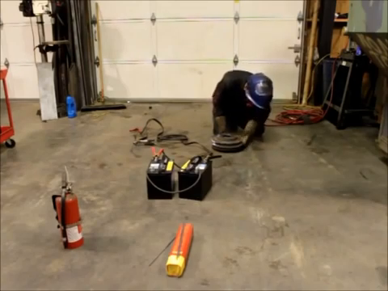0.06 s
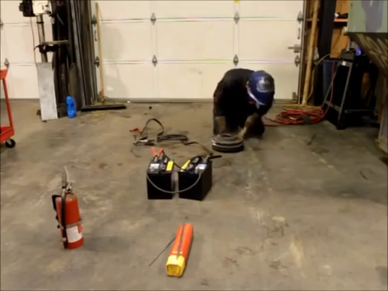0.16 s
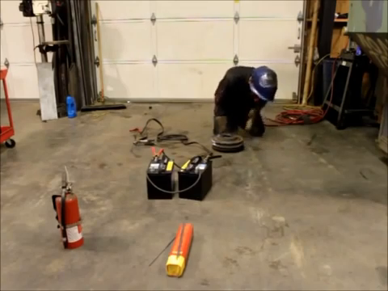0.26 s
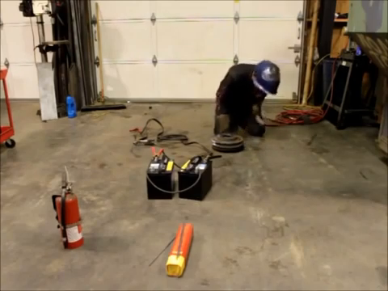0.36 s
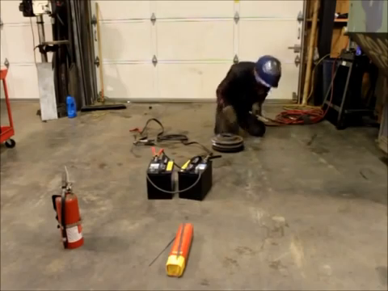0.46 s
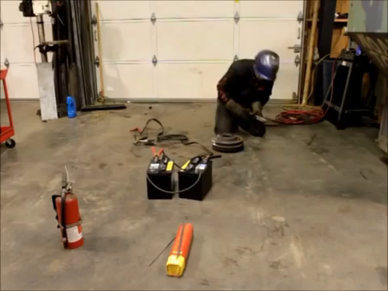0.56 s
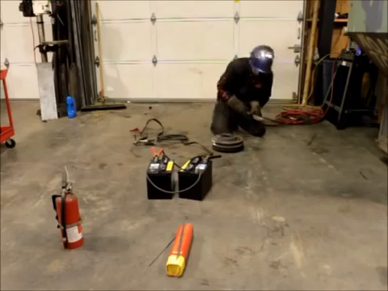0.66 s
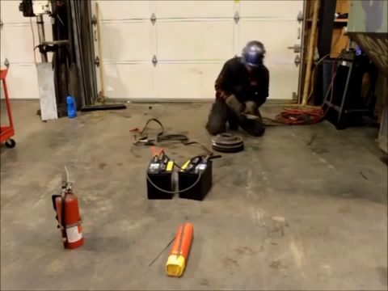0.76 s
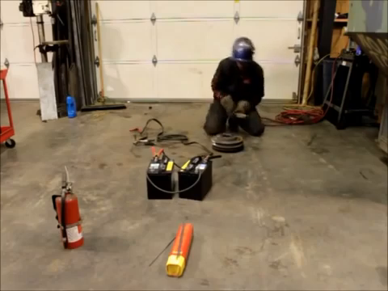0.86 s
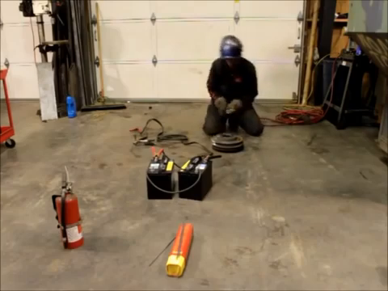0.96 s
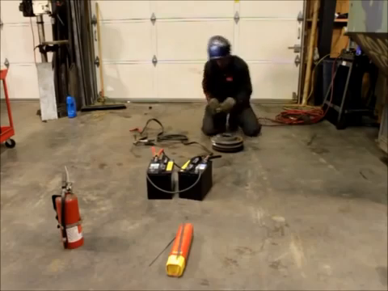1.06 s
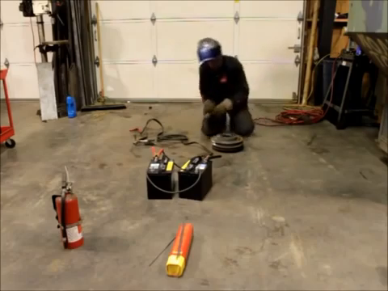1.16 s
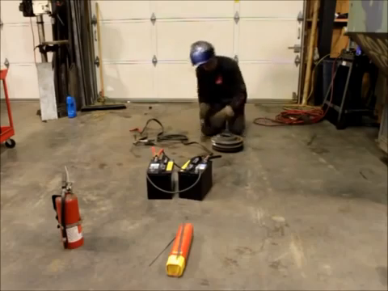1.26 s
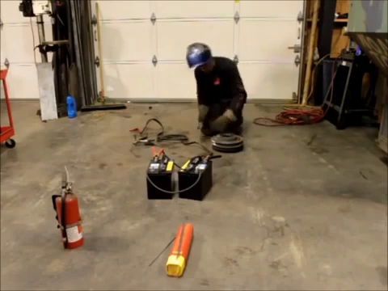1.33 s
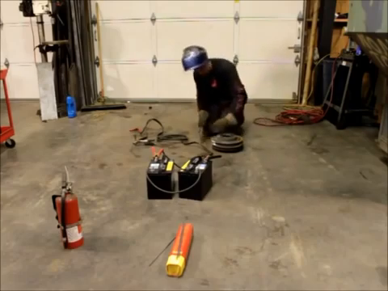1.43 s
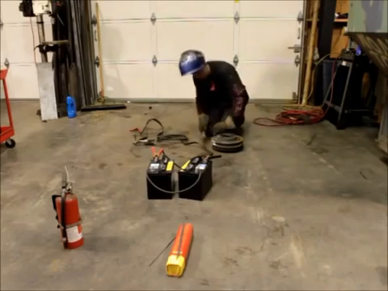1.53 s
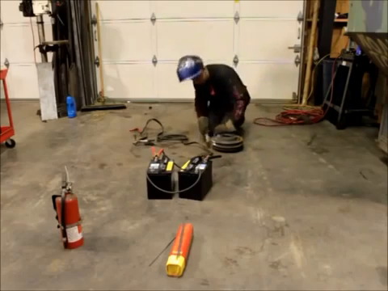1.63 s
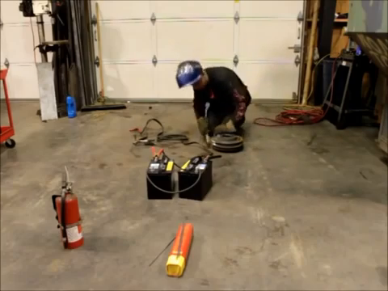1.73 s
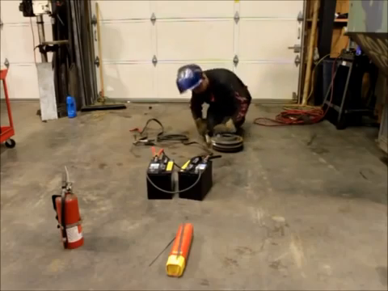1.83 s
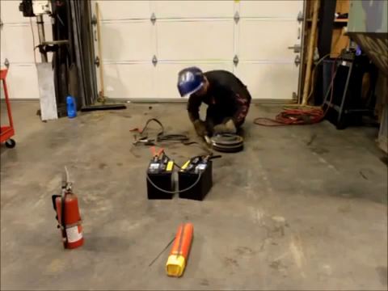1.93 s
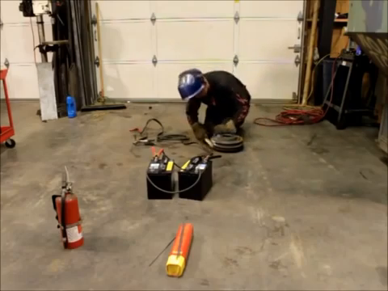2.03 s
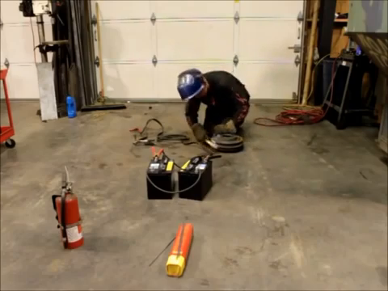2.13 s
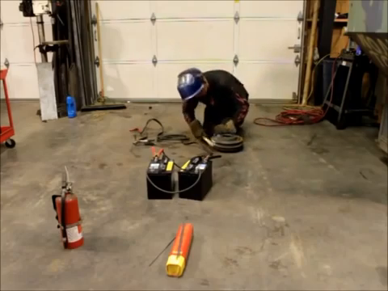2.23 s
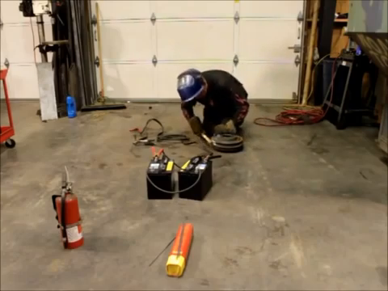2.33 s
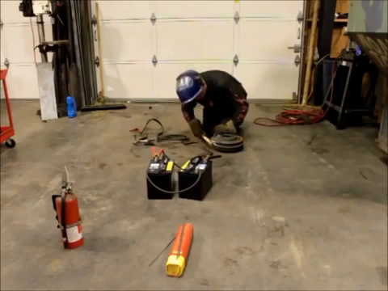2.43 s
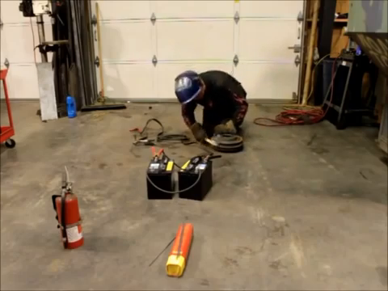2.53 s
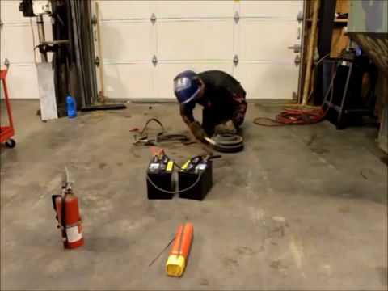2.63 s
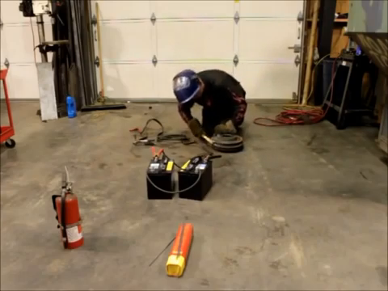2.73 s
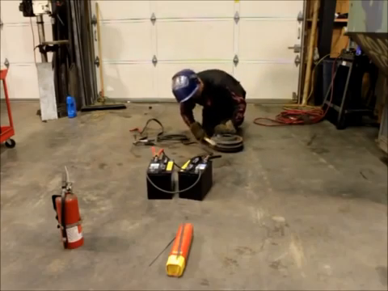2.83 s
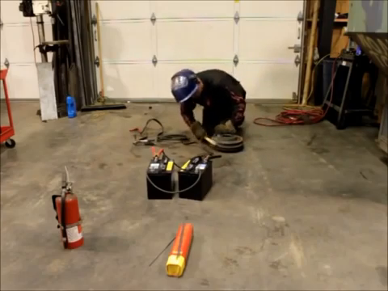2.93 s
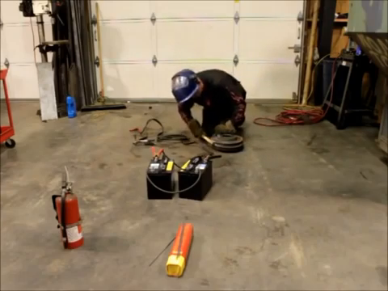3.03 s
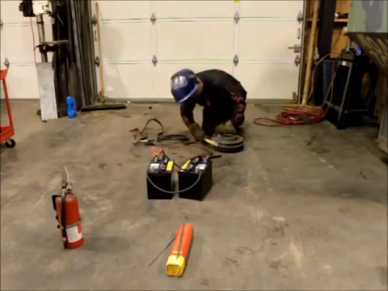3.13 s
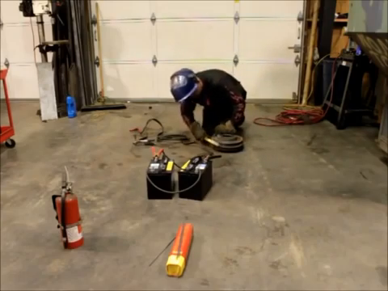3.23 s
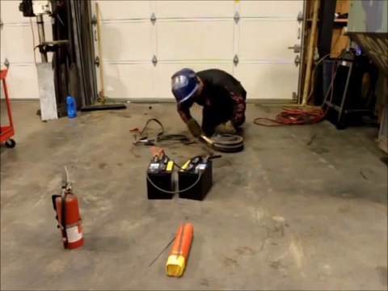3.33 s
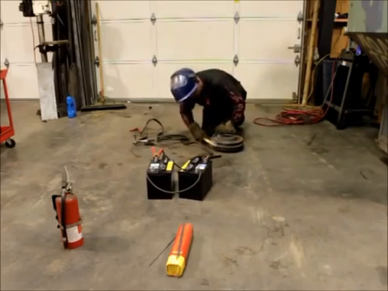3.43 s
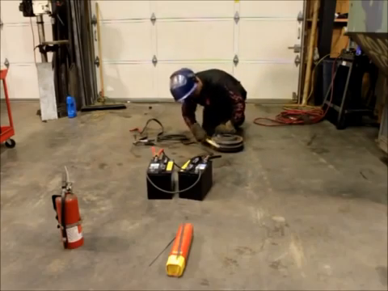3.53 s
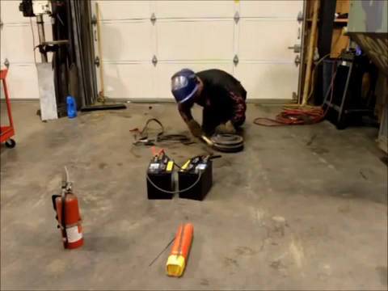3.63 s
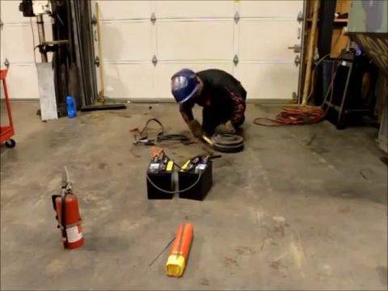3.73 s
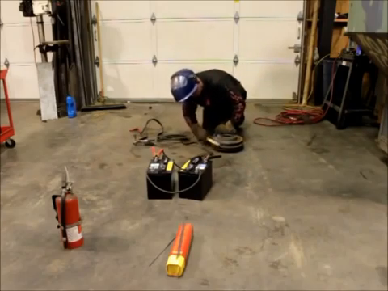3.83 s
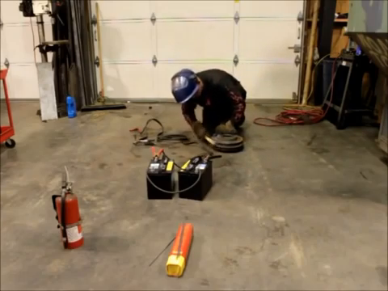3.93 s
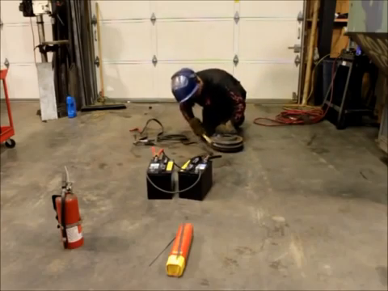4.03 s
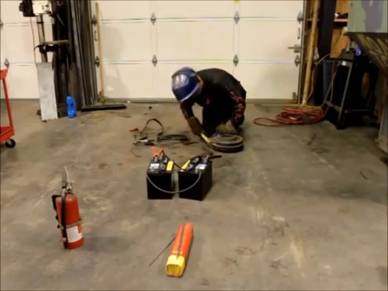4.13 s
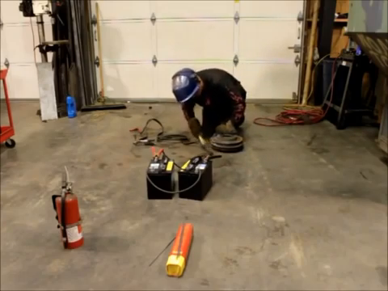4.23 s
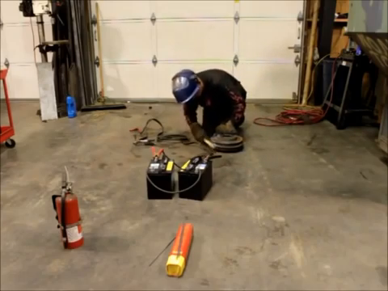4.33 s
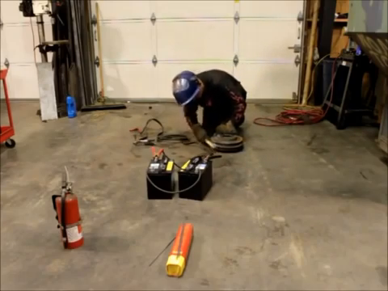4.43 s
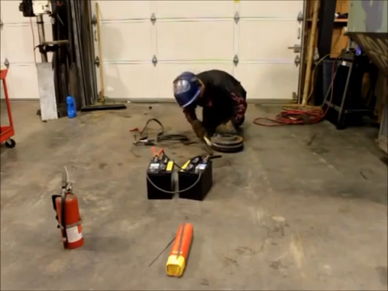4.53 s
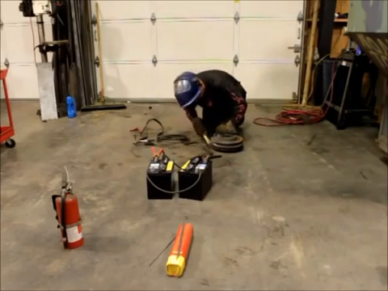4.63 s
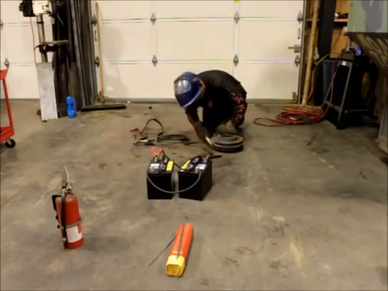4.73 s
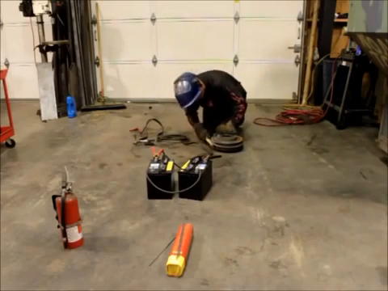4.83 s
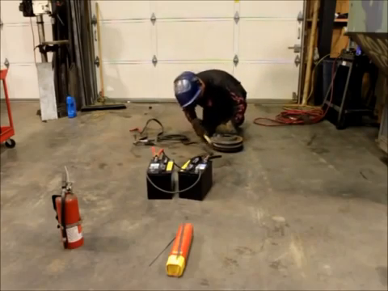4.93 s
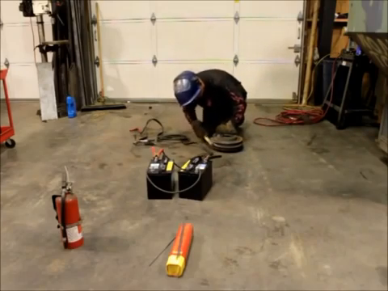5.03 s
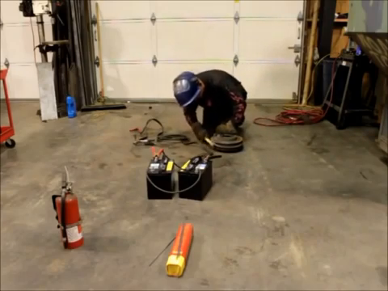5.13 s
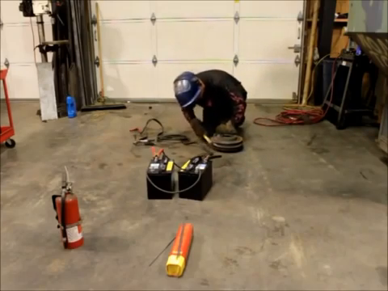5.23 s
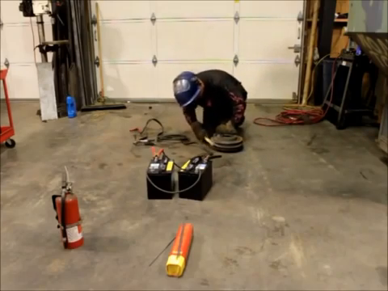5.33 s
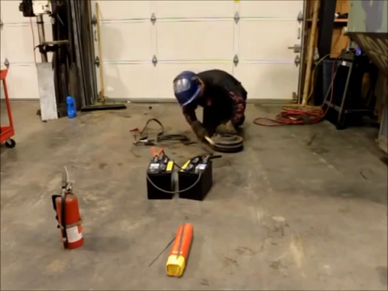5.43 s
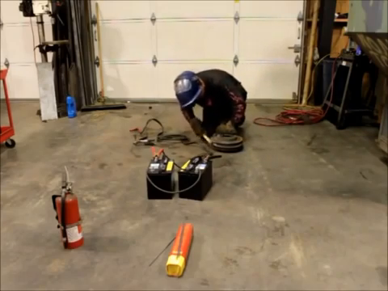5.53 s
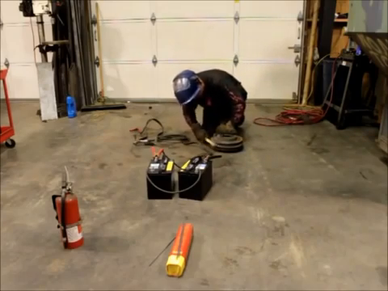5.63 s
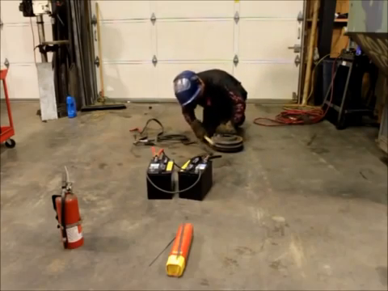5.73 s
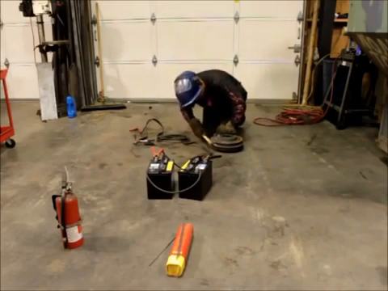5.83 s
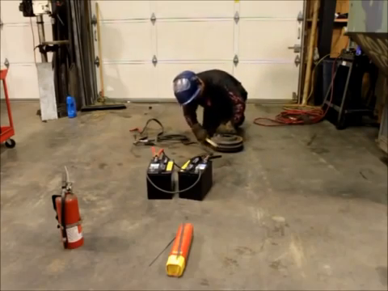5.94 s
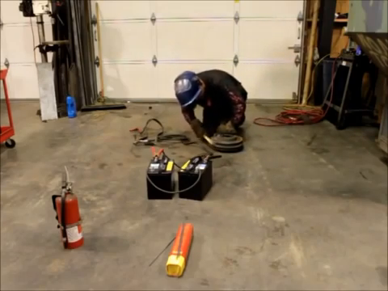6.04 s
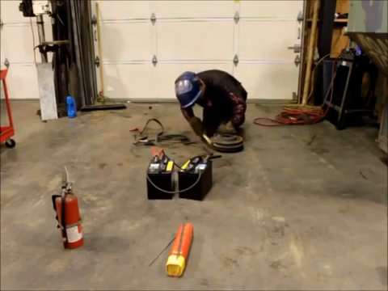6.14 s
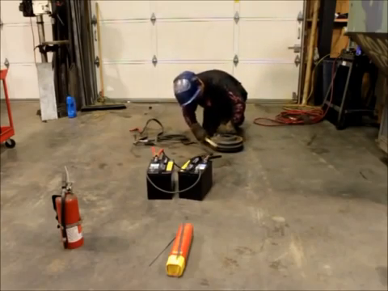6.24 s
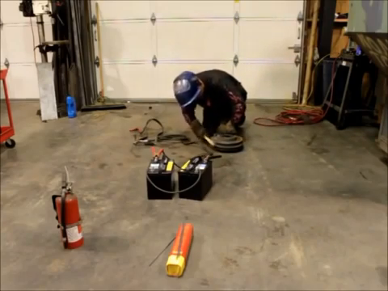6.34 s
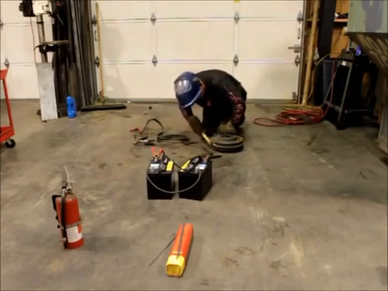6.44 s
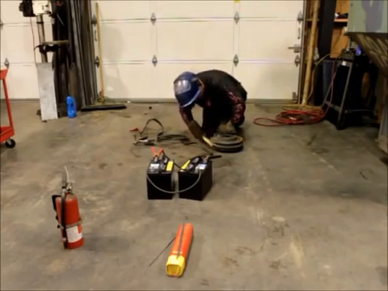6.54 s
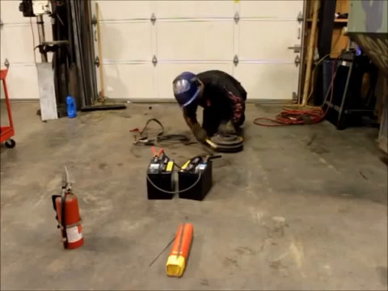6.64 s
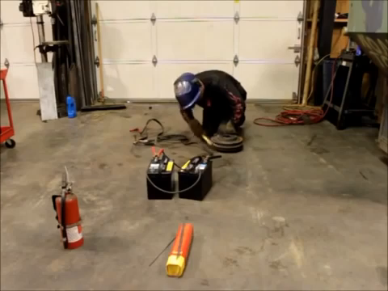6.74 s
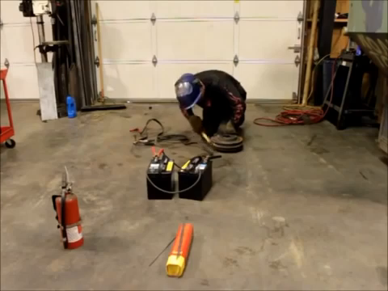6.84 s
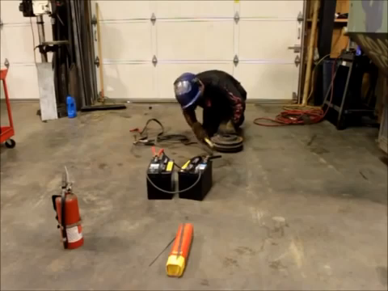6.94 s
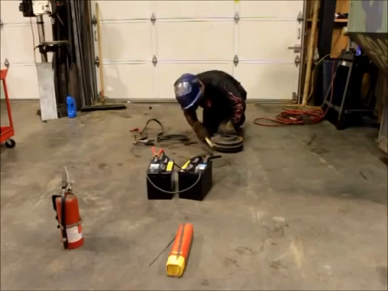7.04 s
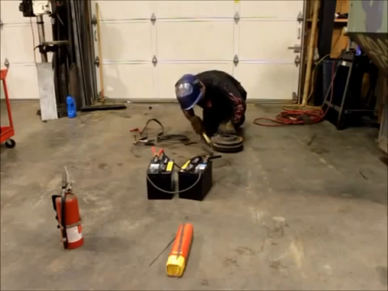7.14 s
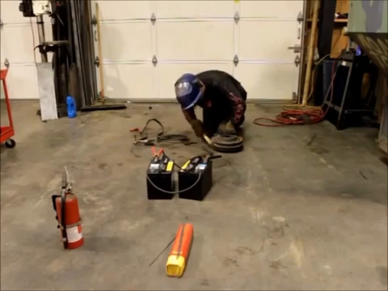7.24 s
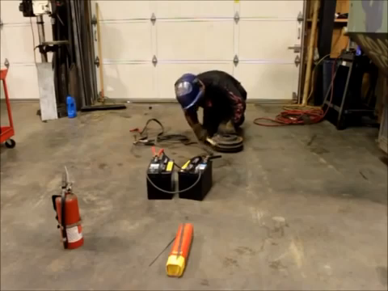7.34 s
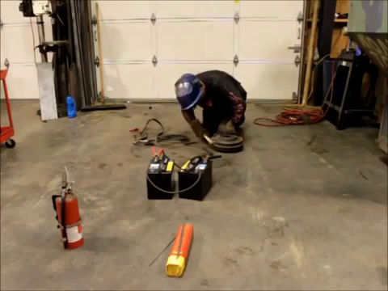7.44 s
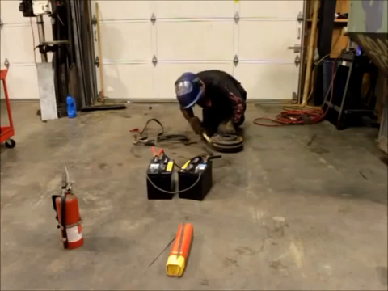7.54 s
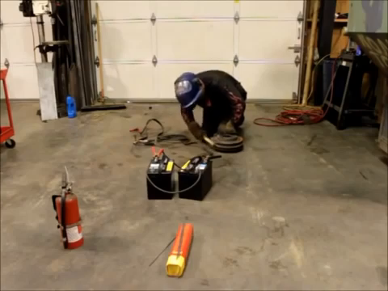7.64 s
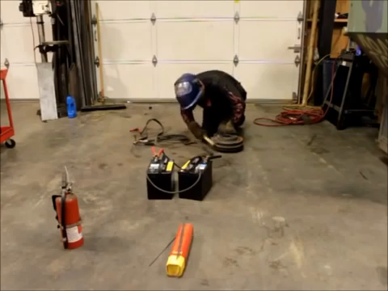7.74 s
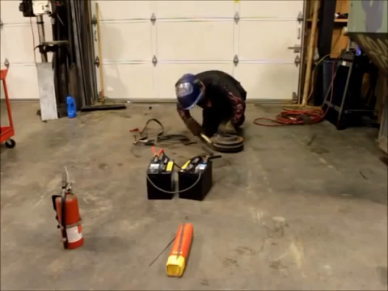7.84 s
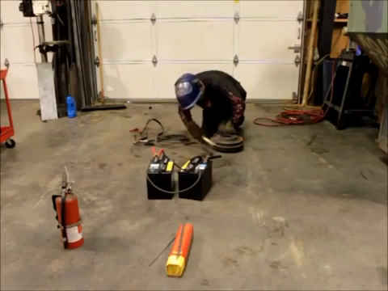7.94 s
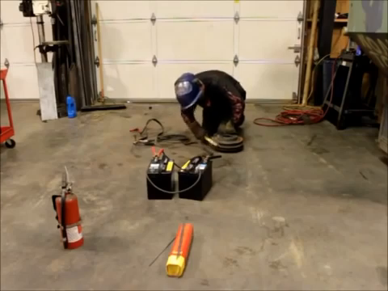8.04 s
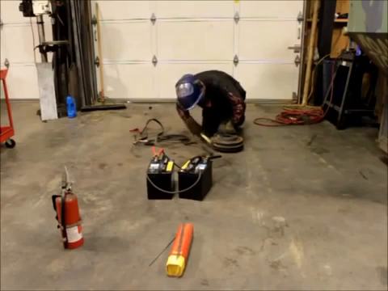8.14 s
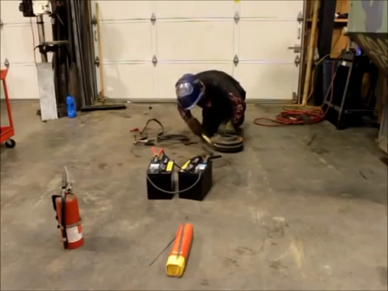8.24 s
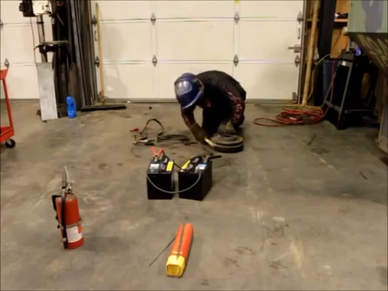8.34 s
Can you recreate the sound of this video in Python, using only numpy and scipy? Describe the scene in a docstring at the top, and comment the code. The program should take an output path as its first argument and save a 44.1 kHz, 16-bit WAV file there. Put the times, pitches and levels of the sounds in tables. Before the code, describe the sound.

Two hard scrapes and a clonk, a quiet rustling pause, then rapid hissing wire-brush scrubbing on steel, over mains hum in a reverberant garage.

```python
"""A wire brush rasps over a steel disc on a concrete garage floor, about seven strokes a second when in full swing.
Shaped random clicks make the hiss of the wire tips and the rasp of the surface, and also drive the disc's modes.
The disc rocks with grating, thuds and clonks; in the pauses the brush is handled and cloth rustles.
Mains harmonics buzz throughout over a low drone and a rush of air; decaying noise draws out the contact sounds."""
import sys
import numpy as np
from scipy import signal
from scipy.fft import irfft
from scipy.io import wavfile

SR = 44100
rng = np.random.default_rng(int(sys.argv[2]) if len(sys.argv) > 2 else 0)


def unload_wav(signal):
    """Save mono or channel-first audio to the path in sys.argv[1] as 16-bit WAV at rate SR, clipped to [-1, 1]."""
    wavfile.write(
        sys.argv[1],
        SR,
        np.round(np.clip(np.atleast_2d(signal).T, -1, 1) * 32767).astype(np.int16),
    )


N = 369558
TIME = np.arange(N) / SR
TOP_HZ = 15050  # upper limit of the sound

# Brush strokes. Each row: moment of top speed in seconds, relative level of the wires in dB.
STROKES = [(.008, -24), (.115, -21.5), (0.169, -29.5), (2.108, -28.5), (2.31, -30), (2.575, -27.5),
           (2.736, -26), (2.909, -27), (3.041, -25.5), (3.204, -26), (3.344, -24), (3.508, -27.5),
           (3.666, -26), (3.832, -29.5), (3.905, -29.5), (4.011, -22.5), (4.551, -28.5), (4.838, -30.5),
           (4.97, -26.5), (5.136, -28), (5.256, -27), (5.412, -26.5), (5.523, -23.5), (5.689, -26),
           (5.812, -25), (5.976, -25.5), (6.096, -24), (6.272, -26), (6.415, -24), (6.629, -28),
           (6.788, -27.5), (6.986, -26.5), (7.136, -29), (7.353, -27), (7.488, -25.5), (7.703, -28),
           (7.843, -28), (8.02, -27.5), (8.145, -25.5), (8.345, -29)]
# Spectrum of the hissing wire tips. Each row: frequency in Hz, relative density in dB per Hz.
WIRES = [(1500, -43), (3500, -11), (5300, -5.5), (7000, -1.5), (9000, -1), (10800, 0.5), (13000, 0),
         (15000, -3)]
# Spectrum of the scraped surface. Each row: frequency in Hz, relative density in dB per Hz.
RASP = [(150, -23), (400, -10.5), (900, -4.5), (1500, -4), (2200, 1), (2850, 3), (3400, 1), (4600, -1.5),
        (7000, -23), (14000, -40)]


def undb(db):
    """Decibels are twenty times the logarithm of an amplitude ratio; this recovers the ratio."""
    return 10 ** (np.asarray(db) / 20)


def unit(x):
    """Root-mean-square normalisation: the mean power becomes 1."""
    return x / np.sqrt(np.mean(x ** 2))


def along(points, hz):
    """Interpolate (Hz, value) points linearly on a logarithmic frequency axis."""
    f, value = np.transpose(points)
    return np.interp(np.log(np.maximum(hz, 1)), np.log(f), value)


def colour(x, points):
    """Linear-phase filtering by a spectrum of unit mean power, so white noise nearly keeps its power."""
    hz = np.fft.rfftfreq(2048, 1 / SR)
    gain = undb(along(points, hz)) * (hz < TOP_HZ + 500)
    response = np.fft.fftshift(irfft(unit(gain))) * np.hanning(2048)
    return signal.fftconvolve(x, response, "same")


def ring(x, response):
    """Linear systems respond by convolution; the impulse response is scaled to unit energy."""
    return signal.fftconvolve(x, response / np.sqrt(np.sum(response ** 2)))[:N]


def walk(rate):
    """Slow random modulation: normal values, rate per second, joined by straight lines."""
    return np.interp(TIME * rate, np.arange(N), rng.standard_normal(N))


def flicks(rate, spread_db):
    """Shot noise: random clicks of uneven size and mean power 1; rate (per second) may vary."""
    share = np.clip(rate / SR, .001, 1)  # chance of a click in each sample
    size_db = spread_db * np.clip(rng.standard_normal(N), -2.5, 2.5)
    size = undb(size_db) * rng.choice([-1, 1], N)
    happens = rng.random(N) < share
    return unit(happens * size / np.sqrt(share))  # constant power at any rate


def decay(age, t60):
    """Exponential damping: the amplitude falls by 60 dB in t60 seconds."""
    return np.exp(-np.log(1000) * age / t60)


def burst(start, rise, t60):
    """Envelope of a contact: linear rise, then exponential damping down to -120 dB."""
    age = TIME - start
    return np.clip(age / rise, 0, 1) * decay(np.clip(age - rise, 0, 2 * t60), t60)


def air(db=-46.5):
    """Ventilation as broadband turbulence: filtered noise with a slight waver in level."""
    # Each row: frequency in Hz, relative density in dB per Hz.
    rush = [(25, -30), (60, 1), (95, -9), (135, -1), (190, 3.5), (290, 0.5), (550, 1.5), (900, 1),
            (1600, -4), (4000, -9), (8000, -12.5), (15000, -23)]
    return colour(rng.standard_normal(N), rush) * undb(db + 0.2 * walk(5.5))


def drone(waver_db=1.0):
    """A distant motor as two tones with random amplitude and phase modulation."""
    # Tones. Each row: frequency in Hz, rms level in dB before the course below is added.
    tones = [(136.7, -62.5), (184.7, -65)]
    # Course of the level. Each row: time in seconds, change in dB.
    course = [(0, 3), (1.5, 2.5), (2.8, -10), (8.38, -9)]
    total = 0
    for hz, db in tones:
        level = undb(db + waver_db * walk(5))
        total = total + level * unit(np.sin(2 * np.pi * hz * TIME + 1.0 * walk(5.6)))
    return total * undb(np.interp(TIME, *np.transpose(course)))


def buzz(lines_db=-1.5, rest_db=0, odd_db=-6, waver_db=1.1):
    """Iron laminations rattle twice per mains cycle: a harmonic series whose groups waver slowly."""
    # Strongest harmonics. Each row: frequency in Hz, rms level in dB before lines_db is added.
    strong = [(60, -61), (120, -63), (240, -60), (360, -63), (480, -56), (600, -59), (720, -60),
              (1200, -57), (1320, -57), (1440, -62), (1560, -57), (1920, -59), (2160, -53), (2640, -59),
              (2760, -61), (2880, -56), (3600, -58.5), (5400, -63), (5520, -63), (5880, -61), (5940, -61),
              (6000, -65), (6480, -65), (6720, -61), (6960, -67), (8280, -69), (8400, -67), (8520, -70)]
    # Weaker harmonics. Each row: frequency in Hz, rms level in dB before scatter and odd_db.
    weak = [(120, -74), (1000, -67.5), (3000, -71), (6000, -68.5), (8000, -82), (10000, -99), (15000, -89)]
    mains_hz = 60
    order = np.arange(1, TOP_HZ // mains_hz)
    hz = mains_hz * order
    scatter_db = 3.0 * rng.uniform(-0.83, 1, len(hz))
    db = along(weak, hz) + rest_db + odd_db * (order % 2) + scatter_db
    for line_hz, line_db in strong:
        db[round(line_hz / mains_hz) - 1] = line_db + lines_db
    phase = 2 * np.pi * rng.random(len(hz))
    lines = undb(db) * np.exp(1j * phase) * SR / np.sqrt(2)  # scaled from rms to Fourier bins
    out = 0
    for group in np.array_split(rng.permutation(len(hz)), 10):
        spectrum = np.zeros(SR // 2 + 1, complex)  # bins of 1 Hz, hence one repeating second
        spectrum[hz[group]] = lines[group]
        out = out + np.resize(irfft(spectrum), N) * undb(waver_db * walk(1.6))
    return out


def tail(build_s=0.0067):
    """Diffuse reverberation from hard walls: noise damped by frequency, fastest in the high treble."""
    # Each row: frequency in Hz, reverberation time T60 in seconds.
    room_t60 = [(200, 0.54), (1000, 0.91), (3000, 1), (7000, 0.62), (14000, 0.34)]
    hz, t, cells = signal.stft(rng.standard_normal(SR), SR, nperseg=256)
    t60 = along(room_t60, hz)[:, None]
    reflections = signal.istft(cells * decay(t, t60), SR)[1][:SR]
    return reflections * np.minimum(TIME[:SR] / build_s, 1)


def garage(x, wet_db=0.89, count=8):
    """Direct sound plus reverberation; its pattern depends on place, so the input crossfades among several."""
    place = TIME * 70  # steps per second through the cycle of patterns
    wet = 0
    for k in range(count):
        distance = np.abs((place - k) % count - count / 2)
        share = np.sqrt(np.maximum(1 - distance, 0))  # equal-power crossfade
        wet = wet + ring(x * share, tail())
    return x + undb(wet_db) * wet


def rocking():
    """Impacts on concrete: each contact gives grating and a thud, and some blows wake one low mode."""
    # Contacts. Each row: start in seconds, grating level in dB, thud level in dB.
    knocks = [(.005, -35.5, -57), (.1, -33.5, -54), (.21, -50, -54), (4.03, -41, -60), (4.15, -52, -43.5),
              (4.84, -44.5, -64), (7.298, -41, -42.5), (7.48, -37, -47)]
    # Blows. Each row: start in seconds, frequency of the mode in Hz, peak level in dB.
    clonks = [(.002, 1200, -39), (7.25, 500, -37.5), (7.299, 1220, -35.5), (7.48, 1174, -42)]
    # Spectrum of the grating. Each row: frequency in Hz, relative density in dB per Hz.
    grate_shape = [(200, -35), (500, 4), (750, -2), (1050, 6.5), (1200, 1), (1450, 4.5), (3000, -7)]
    # Spectrum of the thud. Each row: frequency in Hz, relative density in dB per Hz.
    thud_shape = [(70, -25), (150, -1), (220, 3), (330, -8.5), (800, -28)]
    grate, thud, tones = 0, 0, 0
    for at, grate_db, thud_db in knocks:
        contact = burst(at, rise=0.0067, t60=0.29)  # seconds
        grate = grate + undb(grate_db) * contact
        thud = thud + undb(thud_db) * contact
    for at, hz, db in clonks:
        envelope = burst(at, rise=.0023, t60=0.12)  # seconds
        tones = tones + undb(db) * envelope * np.sin(2 * np.pi * hz * (TIME - at))
    grating = colour(grate * flicks(2500, spread_db=6.5), grate_shape)
    thudding = colour(thud * rng.standard_normal(N), thud_shape)
    return grating + thudding + tones


def handling(ring_db=-16, rasp_db=-7):
    """Impulsive excitation: taps shake the wires and faintly ring the steel, while cloth friction rustles."""
    # Taps and touches. Each row: start in seconds, level in dB, rise in seconds, T60 in seconds.
    taps = [(.541, -47, .002, .06), (.618, -49, .01, 0.16), (1.105, -37.5, 0.016, .07),
            (1.713, -46, .002, .07), (1.733, -48, .002, .04), (1.795, -37, .001, 0.053),
            (1.808, -43, .002, 0.15), (1.865, -45, 0.0043, 0.16), (1.945, -46, 0.026, 0.21),
            (4.402, -27, 0.0009, 0.037), (4.408, -34, 0.0048, 0.27)]
    # Rustle of clothes as the body moves. Each row: time in seconds, level in dB.
    rustle = [(.4, -73), (.8, -84), (1.05, -55), (1.3, -56.5), (1.5, -71), (1.7, -80), (2, -40), (2.2, -75)]
    envelope = sum(undb(db) * burst(at, rise, t60) for at, db, rise, t60 in taps)
    force = flicks(12000, spread_db=0.5) * envelope
    cloth_db = np.interp(TIME, *np.transpose(rustle)) + 1.3 * walk(30.3)
    cloth = flicks(3000, spread_db=3) * undb(cloth_db)
    both = force + cloth
    return colour(both, WIRES) + undb(rasp_db) * colour(both, RASP) + undb(ring_db) * disc(force)


def disc(force):
    """Modal synthesis: a force excites the damped sinusoidal modes of the steel disc."""
    # Each row: frequency in Hz, relative level in dB, T60 in seconds.
    modes = [(447.4, -8.5, 0.48), (812, -20, 0.41), (901, -9.5, .3), (1474, -4, 0.73), (1647, -3.5, 1),
             (1845, -1, 0.68), (2630, -9, 0.47), (2770, -6.5, 0.079), (2860, -1.5, 0.21), (2926, 0, 0.043),
             (4640, -8, .2), (6900, -6, .04), (7650, -18, .1), (7600, -23, .2), (8900, -15, .15),
             (10800, -6, .15), (10800, -14, .05)]
    t = TIME[:SR]
    response = 0
    for hz, db, t60 in modes:
        amplitude = undb(db) / np.sqrt(t60)  # the level then sets the energy, whatever the decay
        response = response + amplitude * np.sin(2 * np.pi * hz * t) * decay(t, t60)
    return ring(force, response)


def swings():
    """Reciprocating motion: the gaps between strokes set how long each speeds up and slows down (s)."""
    gaps = np.diff(np.array(STROKES)[:, 0])
    gaps = np.pad(gaps, 1, mode="edge")
    speed_up = np.minimum(0.47 * gaps[:-1], 0.093)  # share of the gap before, limit in seconds
    slow_down = np.minimum(.46 * gaps[1:], 0.1)  # share of the gap after, limit in seconds
    return speed_up, slow_down


def brush(wires_db=1, ring_db=-6.5, catch_db=1.5, catch_rate=170, flick_rate=9000):
    """Friction excitation: the faster the brush, the more wire tips flick off the rough steel per second."""
    usual_stroke_db, rasp_base_db = -26, -37.5  # wires and rasp in an ordinary stroke
    rasp_growth = 0.83  # dB of rasp per dB of wire hiss: hard strokes are brighter
    drag_db, drag_t60 = -15, .7  # bent wires drag lightly as the hand turns or lifts (dB, s)
    speed, wire_power, disc_power = np.zeros((3, N))
    for (at, db), rise, fall in zip(STROKES, *swings()):
        span = slice(max(int((at - rise) * SR), 0), int((at + drag_t60) * SR))
        age = TIME[span] - at
        phase = np.clip(age / np.where(age < 0, rise, fall), -1, 1)
        swing = np.cos(np.pi / 2 * phase)
        drag = (age > 0) * undb(drag_db) * decay(np.maximum(age - fall, 0), drag_t60)
        swing = np.maximum(swing, drag)
        rasp_db = rasp_base_db + rasp_growth * (db - usual_stroke_db)
        speed[span] += swing
        wire_power[span] += (swing * undb(db)) ** 2
        disc_power[span] += (swing * undb(rasp_db)) ** 2
    rate = flick_rate * (.2 + speed)  # flicks per second
    # tufts of wire snag on the residue and let go together
    tips = flicks(rate, spread_db=3) * undb(catch_db * walk(catch_rate))
    wires = colour(tips * np.sqrt(wire_power), WIRES)
    # the surface grates under the dragging tips, and the whole disc rings with it
    scrapes = flicks(rate, spread_db=3.5) * undb(3.47 * walk(110))
    rasp = colour(scrapes * np.sqrt(disc_power), RASP)
    ringing = disc(tips * np.sqrt(disc_power))
    return undb(wires_db) * wires + rasp + undb(ring_db) * ringing


def scene():
    """Superposition: reverberant contact sounds and steady background add into two identical channels."""
    contacts = brush() + handling() + rocking()
    mono = garage(contacts) + buzz() + drone() + air()
    return np.array([mono, mono])


def record(dry):
    """Band limiting: a steep elliptic low-pass filter removes the top."""
    low_pass = signal.ellip(12, .1, 80, TOP_HZ, fs=SR, output="sos")  # ripple and stop band in dB
    return signal.sosfilt(low_pass, dry)


dry = scene()
out = record(dry)
unload_wav(out)
```